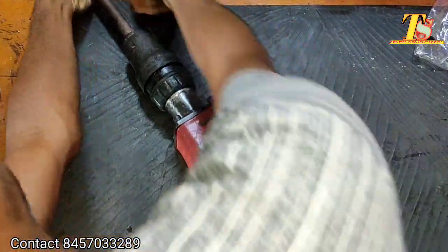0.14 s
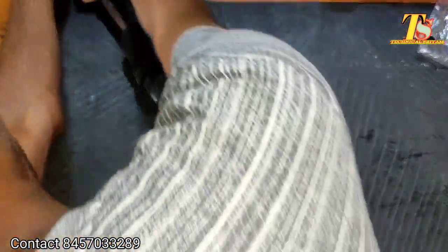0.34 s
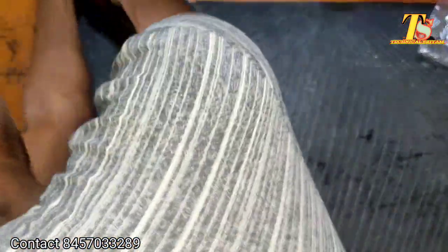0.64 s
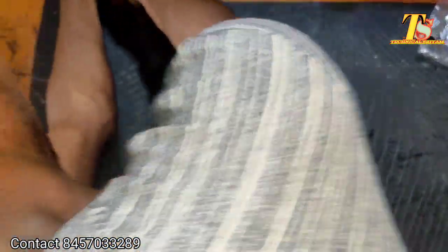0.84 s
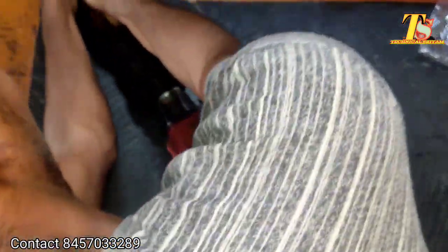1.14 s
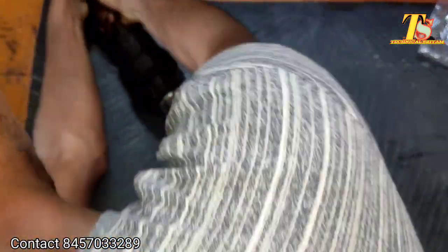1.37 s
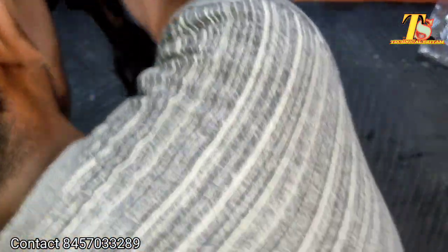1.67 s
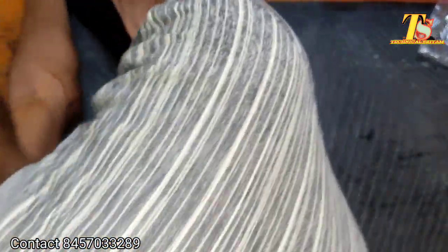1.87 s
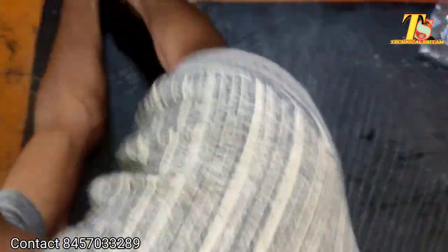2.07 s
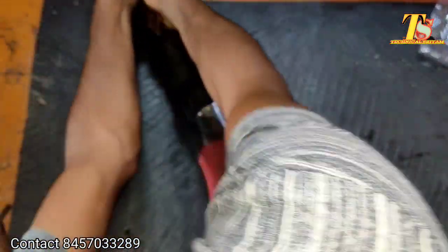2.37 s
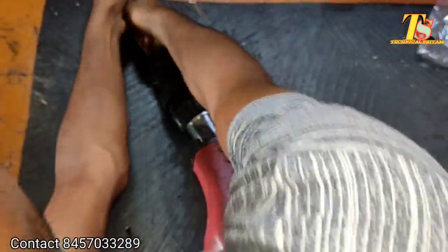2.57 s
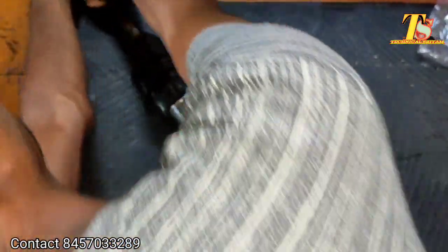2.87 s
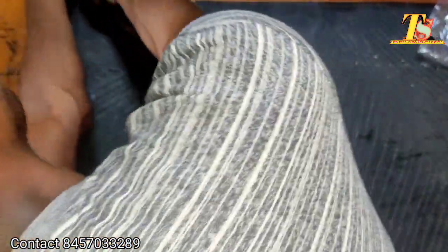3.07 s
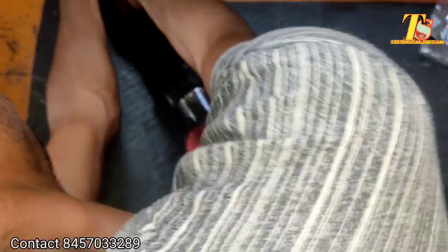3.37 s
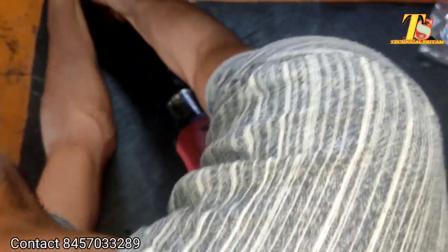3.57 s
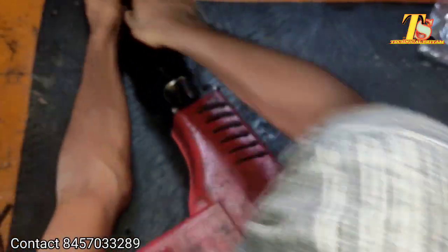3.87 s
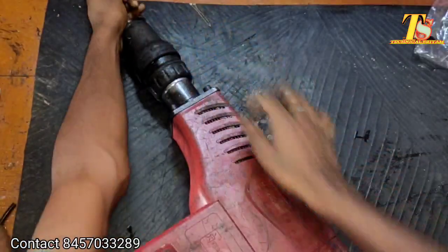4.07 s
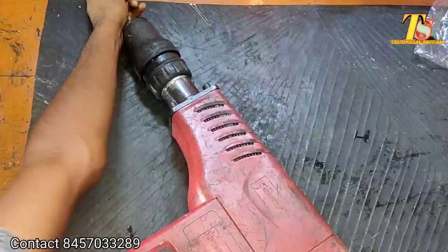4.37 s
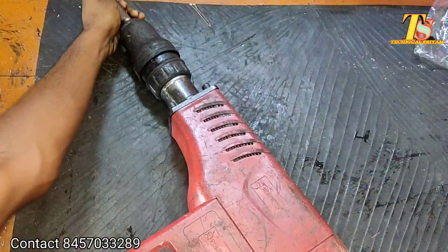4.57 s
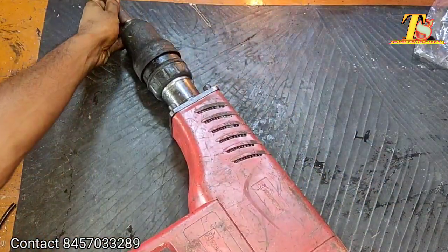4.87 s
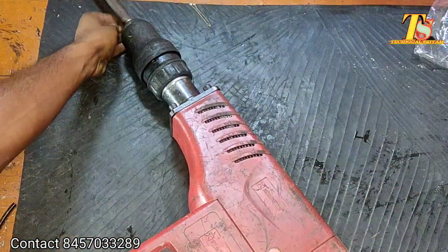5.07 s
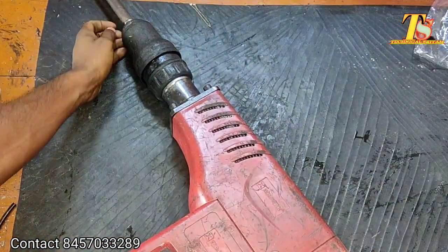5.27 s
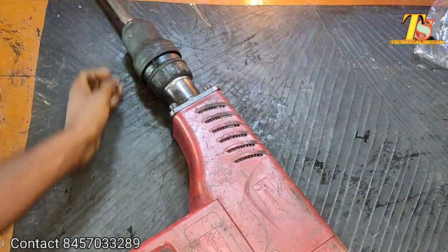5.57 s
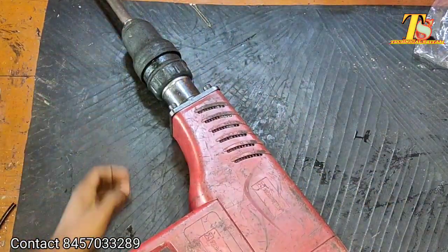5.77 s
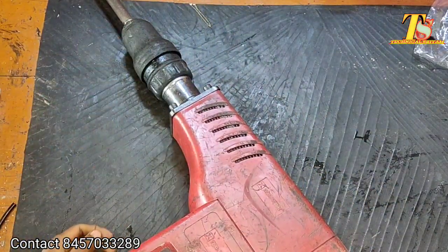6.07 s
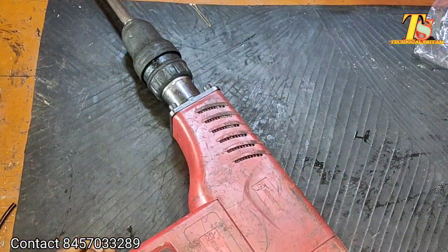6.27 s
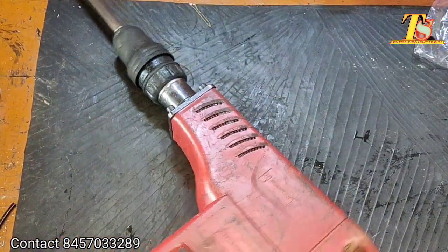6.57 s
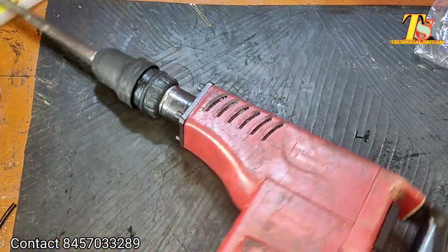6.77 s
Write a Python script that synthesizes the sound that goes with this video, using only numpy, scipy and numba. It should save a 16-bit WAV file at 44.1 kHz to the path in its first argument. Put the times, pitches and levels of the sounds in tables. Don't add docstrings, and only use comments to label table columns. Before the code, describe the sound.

A heavy electric demolition hammer is heard very close on a rubber mat in a small, lightly reverberant workshop. From 0 to 0.8 s it runs free: a grainy gear rattle and whine pulsing about thirty times a second over low bench rumble. From 0.8 to 1.7 s the chisel is pushed in and bright, hard steel blows clatter rapidly, with a loose knock near 1.1 s; the motor slows and its noise ducks. The whirr swells back with a short jingle. Further hammering bursts come at 2.1-2.8 s and 3.35-4.05 s, the last hardest at first and fading at release. Power is cut around 4.3 s with small ticks. The whine falls in pitch and the pulses spread into separate, slowing chuffs, with a bench shudder near 4.9 s, a loud sharp knock at 5.8 s and another at 6.6 s. The tool scrapes faintly over the mat at the end, almost stopped at 6.9 s.

```python
import sys
import numpy as np
from scipy import signal
from scipy.fft import rfft, irfft, next_fast_len
from scipy.io import wavfile
from scipy.ndimage import uniform_filter1d
from numba import njit

SR = 44100
rng = np.random.default_rng(int(sys.argv[2]) if len(sys.argv) > 2 else 0)


def generate_wav(sig):
    pcm = np.round(np.clip(np.atleast_2d(sig).T, -1, 1) * 32767).astype(np.int16)
    wavfile.write(sys.argv[1], SR, pcm)


def gain_from_db(level_db):
    decades = np.asarray(level_db, float) / 20
    return 10 ** decades


N = 305169
SPAN = next_fast_len(N)
POWER_OFF_S = 4.33
PRESS_S, RECOVER_S = 0.039, 0.075


# t/s, rate/(turns per s)
CRANK_SPEED = [(0.0, 29.43), (0.6, 30.32), (1.24, 25.35), (1.55, 24.23), (1.94, 27.57), (2.07, 27.4),
               (2.49, 24.72), (2.74, 24.99), (3.16, 28.7), (3.34, 28.77), (3.81, 24.88), (4.0, 24.92),
               (4.34, 28.44), (4.52, 28.1), (5.12, 19.94), (5.89, 12.41), (6.64, 7.3), (6.92, 4.3)]


def crank_angle():
    return np.cumsum(curve(CRANK_SPEED)[0]) / SR + .02


# t/s, level/dB, tooth whine/dB
GEAR_NOISE = [(0, -36, 3), (.27, -37, 2.5), (.77, -33.5, 4.5), (1.75, -34.5, -5), (2.05, -37, 5),
              (2.9, -38, 5.5), (3.3, -33.5, -1.5), (4.15, -36.5, 3), (5, -36, 0), (5.3, -37, 5.5),
              (5.6, -35.5, -1), (5.9, -37.5, 0.5), (6.2, -39, 4.5), (6.45, -41, 7), (6.55, -41.5, -9),
              (6.7, -42, 1), (6.92, -41.5, -16.5)]
# housing rattle/dB, fan hiss/dB, mat drone/dB, whine/dB, steady share of whine, chuff/dB
FREE_RUN = (1.5, 0.5, -6.5, 0.5, .5, 2.5)
PUSHED_IN = (3.5, 8, -0.5, 8.5, -0.25, -4)
SAGGING_MOTOR = (-0.5, -1.5, -2, 8, 0.05, 4.5)
JUST_LET_GO = (1, 0.5, -3, -6, -.1, -2)
POWER_CUT = (-1, -2, -5.5, 0.5, -0.03, 3)
SLOWING_CRANK = (-2.5, -8, 13, -2.5, -0.07, 5)
DRAGGED_TOOL = (-1, 7, 5.5, 0.1, -4, -4)


def running_gear(turns):
    level_db, tooth_db = curve(GEAR_NOISE)
    gain = gain_from_db(level_db + ducking_db())
    rows = np.transpose([FREE_RUN, PUSHED_IN, SAGGING_MOTOR, JUST_LET_GO,
                         POWER_CUT, SLOWING_CRANK, DRAGGED_TOOL])
    dragged = ramp(6.77, 0.082)
    pushed, sag, let_go, off, slow = states(turns)
    mix = np.array([np.ones(N), pushed, sag, let_go, off, slow, dragged])
    rattle_db, fan_db, mat_db, whine_db, steady, chuff_db = rows @ mix
    for start, end, _, _, push_db in PUSHES:
        eased_db = push_db - 5.5 * before(end, 0.058)
        whine_db = whine_db + eased_db * (ramp(start, 0.48) - ramp(end, PRESS_S))
    whine_db = whine_db + tooth_db * (1 - pushed) - 2.55 * np.abs(walk(14))
    each_turn = rng.standard_normal(200)[(turns + .5).astype(int)]
    squeeze = bump(turns, 0.95, 0.076) + 0.13 * bump(turns, 0.35, 0.14)
    chuff = gain_from_db(chuff_db * (1.5 + 0.08 * each_turn) * squeeze + 1.1 * walk(60))
    band_db = mat_db, 2.5, rattle_db + 8.0 - 1.9 * off, fan_db + 8.5
    noise = housing_noise(chuff, band_db)
    tone = tooth_whine(turns, slow, whine_db + each_turn, steady) * gain
    hz = np.fft.rfftfreq(SPAN, 1 / SR)
    whine = irfft(rfft(tone, SPAN) * (0.77 + resonances(SHELL_MODES, hz)), SPAN)[:, :N]
    return gain * noise + whine + backlash(turns, gain, whine_db)


# f/Hz, level/(dB per Hz)
GEAR_SPECTRUM = [(59, -70), (100, -5.5), (285, -3), (345, 0), (814, -0.5), (1110, 3), (2470, -11),
                 (3680, -12), (4640, -11.5), (7510, -7.5), (9070, -2), (13800, -10), (15000, -48)]
# f/Hz, width/Hz, level/dB
SHELL_MODES = [(647, 28, 6), (820, 98, 0), (1079, 10.5, 7.5), (1196, 108, 5), (1460, 184, -5),
               (1747, 51, -3), (2640, 350, 1), (3598, 152, 8.5), (3790, 77, 9.5), (4060, 160, 4),
               (7000, 940, 4.5), (8810, 510, 8), (11080, 780, 7.5)]
# f/Hz, width/Hz, level/dB
MAT_MODES = [(97, 3.8, 8), (227.4, 27, 7), (332.5, 28, 3.5), (498, 29, -0.5)]
# f/Hz, correlation/(0-1)
STEREO_LIKENESS = [(60, 0.96), (130, 0.97), (290, 0.93), (630, 0.74), (1390, 0.08), (3040, 0.14),
                   (6670, 0.02), (14600, -0.0)]
# f/Hz, left minus right/dB
STEREO_BALANCE = [(60, 6), (110, 1), (200, 2), (370, 1.0), (690, 2), (1270, 1.0), (2340, 0), (4310, 2.5),
                  (7940, -6), (14600, 9.5)]


def housing_noise(chuff, band_db):
    grain = gain_from_db(1.92 * np.minimum(rng.exponential(1, N // 8 + 1), 3)).repeat(8)[:N]
    hz = np.fft.rfftfreq(SPAN, 1 / SR)
    bed = rfft(rng.standard_normal((2, N)) * grain * chuff ** .3, SPAN)
    bed = bed * (1 + resonances(MAT_MODES, hz))
    rung = rfft(rng.standard_normal((2, N)) * grain * chuff, SPAN)
    rung = rung * (.25 + resonances(SHELL_MODES, hz)) / (1 + (hz / 9000) ** 2)
    mid, side = (bed + gain_from_db(-4.5) * rung) * gain_from_db(on_log(GEAR_SPECTRUM, hz))
    like = np.clip(on_log(STEREO_LIKENESS, hz), 0, 1)
    tilt = gain_from_db(on_log(STEREO_BALANCE, hz) / 2)
    shared, apart = mid * np.sqrt(1 + like), side * np.sqrt(1 - like)
    pair = np.array([(shared + apart) * tilt, (shared - apart) / tilt])
    below = [1 / (1 + (hz / edge_hz) ** 6) for edge_hz in (420, 2000, 5200)]
    shares = below[0], below[1] - below[0], below[2] - below[1], 1 - below[2]
    noise = sum(unit(irfft(pair * share, SPAN)[:, :N]) * gain_from_db(db) for share, db in zip(shares, band_db))
    upper = unit(band(rng.standard_normal((2, N)), 3540, 3910))
    upper = upper + .5 * unit(band(rng.standard_normal((2, N)), 3870, 4330))
    return noise + gain_from_db(-3) * ramp(POWER_OFF_S, .5) * chuff ** 0.85 * upper


def tooth_whine(turns, slow, level_db, steady):
    teeth = 59
    pace = np.gradient(turns) * SR / 30
    mesh = 2 * np.pi * teeth * turns + (.35 + 1.5 * pace ** 2) * walk(70)
    mesh = mesh + 1.5 * pace ** 2 * np.sin(2 * np.pi * (turns - .96))
    tone = np.sin(mesh + np.array([[0], [.8]]))
    tone = tone + gain_from_db(-9.0 + 8.5 * slow ** 2) * np.sin(2 * mesh) + gain_from_db(-12) * np.sin(3 * mesh)
    return tone * gain_from_db(level_db) * (np.clip(steady, 0, 1) + bump(turns, 0.935, 0.066))


def backlash(turns, gain, whine_db):
    pace = np.gradient(turns) * SR / 30
    once_a_turn = np.diff(np.floor(turns - .92), prepend=-1)
    clack = once_a_turn * gain * pace ** 4 * gain_from_db(whine_db + 5 + 3.4 * walk(30.9))
    return ring(clack, 1690 + 30 * walk(24), 0.067)


# start t/s, end t/s, blow level/dB, change toward the release/dB, extra tooth whine/dB
PUSHES = [
    (0.813, 1.655, -28, 4, 0),
    (2.069, 2.812, -26.5, 2.5, 5),
    (3.355, 4.044, -25.5, -9, 3.5),
]
# f/Hz, spread/Hz, level/dB, T60/s, left minus right/dB, blow arrival/turn
STEEL_MODES = [(3335, 176, -17, 0.15, -6, 0.096), (5403, 184, -1.5, 0.017, -9, 0.37),
               (7666, 83, 4.5, 0.054, -9.5, 0.15), (7960, 140, -6.5, 0.043, -22, 0.1),
               (10680, 114, -4, 0.073, 3.5, 0.4), (10840, 140, -12, 0.099, 12.5, 0.29),
               (9520, 570, -20, 0.024, -15, 0.26), (13670, 157, -9, 0.056, 4.5, 0.52)]
# t/s, level/dB
STRAY_TAPS = [
    (1.966, -31),
    (3.314, -28),
    (3.922, -24),
]
# start t/s, end t/s, level/dB
JINGLES = [
    (1.836, 1.97, -33),
    (2.99, 3.13, -38.5),
]


def chisel(turns):
    strength = np.zeros(N)
    for start, end, db, ease_db, _ in PUSHES:
        level = gain_from_db(db - 5.5 * after(start, 0.031) + ease_db * before(end, 0.049))
        strength += level * (np.arange(N) >= start * SR) * (np.arange(N) < end * SR)
    single = gain_from_db(-22) * (np.diff(1. * (strength > 0), prepend=0) > 0)
    for s, db in STRAY_TAPS:
        single[int(s * SR)] = gain_from_db(db)
    ticks = (rng.random(N) < 400 / SR) * rng.standard_normal(N)
    chatter = 0.42 * ticks * (1 - 0.79 * bump(turns, 0.75, 0.16))
    out = np.zeros((2, N))
    for hz, spread_hz, db, t60, pan_db, at in STEEL_MODES:
        count = np.floor(turns - at).astype(int)
        grip = .5 * walk(12)
        pan = gain_from_db(np.array([[pan_db], [-pan_db]]) / 2)
        for offset in np.linspace(-1, 1, num=3):
            blows = np.diff(count, prepend=count[0]) * gain_from_db(2.0 * rng.standard_normal(200))[count]
            pitch = hz + spread_hz * (offset + np.roll(grip, rng.integers(N)))
            mode = ring((blows + chatter) * strength + single, pitch, t60) * gain_from_db(db)
            out += mode * pan * np.array([[1], [1 - 2 * abs(offset)]])
    crack_level = signal.lfilter([1], [1, -.99], np.abs(chatter) * strength + single)
    crack = band(crack_level * rng.standard_normal((2, N)), 6140, 11300)
    loose = sum(gain_from_db(db) * (ramp(s, 0.008) - ramp(end, .02)) for s, end, db in JINGLES)
    jingle = ring(ticks * loose, 3245 + 15 * walk(8), 0.091)
    return gain_from_db(4.5) * out + gain_from_db(12.5) * crack + jingle


# t/s, peak level/dB, bass level/dB
KNOCKS = [
    (0.3595, -31, -20),
    (1.1346, -12, -31),
    (4.0017, -14, -54),
    (4.36, -31, -42),
    (4.434, -22, -51),
    (5.7746, -8, -50),
    (6.6334, -16, -53),
]


def knocks():
    out, t = np.zeros((2, N)), np.arange(4000) / SR
    for s, db, bass_db in KNOCKS:
        decay = np.exp(-t / 0.00041) + 0.3 * np.exp(-t / 0.025)
        tick = rng.standard_normal((2, 4000)) * decay * gain_from_db(db)
        thud = np.sin(2 * np.pi * 55 * t) * np.exp(-t / 0.0067) * gain_from_db(bass_db + 7)
        out[:, int(s * SR):int(s * SR) + 4000] += band(tick, 460, 13500) + thud
    return out


# t/s, level/dB
BENCH_SHAKE = [(0, -27), (.04, -41), (.33, -36), (.8, -32), (.88, -31), (1.2, -40.5), (1.7, -40),
               (2.1, -39), (2.85, -41), (3.25, -41.5), (4.1, -41.5), (4.43, -42.5), (4.85, -31),
               (4.96, -39), (5.1, -55), (6.0, -49), (6.92, -49)]


def shake(turns):
    pushed, sag, let_go, off, _ = states(turns)
    held = 1 - ramp(0.78, .1)
    busy = np.clip(pushed + let_go, 0, 1)
    free = np.clip(1 - held - busy - off, 0, 1)
    rows = np.transpose([  # once, twice and four times a turn, dB
        (-0.91, -8, -10.5),
        (-11, 2.5, -2.5),
        (-0.5, -14, -18),
        (4.4, -2.5, 0.5),
        (-18, -9.5, -11)])
    levels = rows @ np.array([held, free, busy * (1 - held), sag + .5 * let_go, off])
    speed = np.gradient(turns) * SR
    orders = np.zeros(N)
    for order, db in zip((1, 2, 4), levels):
        note_db = off * 8.5 / (1 + (2 * (order * speed - 98) / 12) ** 2)
        orders += np.sin(2 * np.pi * order * turns) * gain_from_db(db + note_db + 2.6 * walk(3.9))
    rumble = unit(band(rng.standard_normal((2, N)), 12.7, 85))
    both = 0.67 * orders + 0.38 * rumble[0] + 0.1 * rumble[1] * np.array([[1], [-1]])
    recoveries_s = [duck[1] for duck in GAIN_DUCKS[:3]]
    swells_db = sum(4.5 * ramp(s, RECOVER_S) * after(s, 0.17) for s in recoveries_s)
    sway = sum(ramp(s, RECOVER_S) * after(s, 0.14) for s in recoveries_s)
    sway = sway * np.sin(2 * np.pi * 17 * np.arange(N) / SR)
    level_db = curve(BENCH_SHAKE)[0] + swells_db - 5.7 * let_go + 2.3 * walk(12)
    return gain_from_db(-39) * sway + both * gain_from_db(level_db)


def workshop_room(near):
    t60_s, level_db = 0.28, -6.5
    t = np.arange(int(.5 * SR)) / SR
    walls = rng.standard_normal((2, len(t))) * gain_from_db(-60 * t / t60_s) * (t > .004)
    walls = walls / np.sqrt(np.sum(walls[0] ** 2))
    return gain_from_db(level_db) * signal.fftconvolve(near, walls, axes=1)[:, :N]


# start t/s, end t/s, depth/dB, deepest t/s, extra depth there/dB
GAIN_DUCKS = [
    (0.779, 1.735, -10.5, .8, -0.5),
    (2.044, 2.887, -7.5, 2.058, -4),
    (3.301, 4.1, -10.5, 3.345, -3),
    (5.747, 5.854, -1.5, 5.845, -4),
]


def ducking_db():
    total_db, drop_s = np.zeros(N), .018
    for start, end, db, low, over_db in GAIN_DUCKS:
        last_db = -5 * before(end, 0.056) * (end - start > .5)
        total_db += (ramp(start, drop_s) - ramp(end, RECOVER_S)) * (db + last_db)
        total_db += over_db * ramp(start, low - start) * (1 - ramp(low, drop_s))
    return total_db


def states(turns):
    speed = np.gradient(turns) * SR
    pushed = sum(ramp(p[0] - PRESS_S, PRESS_S) - ramp(p[1], PRESS_S * 2) for p in PUSHES)
    sag = pushed * np.clip((29.85 - speed) / 5., 0, 1)
    let_go = sum(ramp(p[1], d[1] - p[1]) - ramp(d[1], RECOVER_S) for p, d in zip(PUSHES, GAIN_DUCKS))
    off = ramp(POWER_OFF_S, .25)
    return pushed, sag, let_go, off, off * np.clip(1 - speed / 24, 0, 1)


@njit
def ring(x, hz, t60):
    y, z, p = np.empty(len(x)), 0j, 0j
    for i in range(len(x)):
        if i % 64 == 0:
            p = np.exp(2j * np.pi * hz[i] / SR - np.log(1000) / (t60 * SR))
        z = z * p + x[i] + 1e-18
        y[i] = z.imag
    return y


def resonances(table, hz):
    return sum(gain_from_db(db) / (1 + 2j * (hz - f) / w) for f, w, db in table)


def bump(turns, at, width):
    return np.exp(-.5 * (((turns - at + .5) % 1 - .5) / width) ** 2)


def walk(rate):
    k = int(SR / rate)
    return unit(uniform_filter1d(np.repeat(rng.standard_normal(N // k + 1), k), k)[:N])


def ramp(s, rise_s):
    return np.clip((np.arange(N) / SR - s) / rise_s, 0, 1)


def after(s, decay_s):
    t = np.arange(N) / SR - s
    return (t >= 0) * np.exp(-np.abs(t) / decay_s)


def before(s, rise_s):
    return np.exp(-np.abs(np.arange(N) / SR - s) / rise_s)


def curve(table):
    s, *columns = np.transpose(table)
    return [np.interp(np.arange(N) / SR, s, c) for c in columns]


def on_log(table, hz):
    f, v = np.transpose(table)
    return np.interp(np.log(hz + 1), np.log(f), v)


def unit(x):
    return x / np.sqrt(np.mean(x ** 2))


def band(x, lo_hz, hi_hz):
    return signal.sosfilt(signal.butter(2, [lo_hz, hi_hz], "bandpass", fs=SR, output="sos"), x)


def scene():
    turns = crank_angle()
    near = chisel(turns) + knocks()
    return near + workshop_room(near) + running_gear(turns) + shake(turns)


def band_limit(x):
    return signal.sosfilt(signal.butter(12, 15220, fs=SR, output="sos"), x)


def record(dry):
    rounded = np.tanh(2.2 * dry) / 2.2
    low_pass = signal.ellip(8, .2, 32, 14200, fs=SR, output="sos")
    finished = signal.sosfilt(low_pass, rounded)
    return band_limit(finished)


dry = scene()
out = record(dry)
generate_wav(out)
```